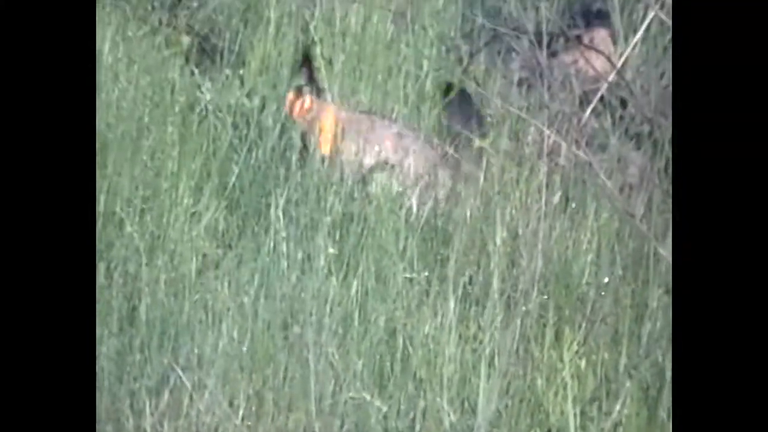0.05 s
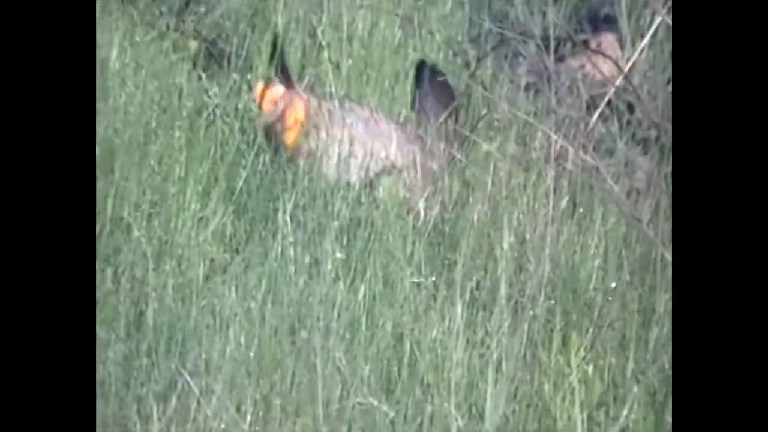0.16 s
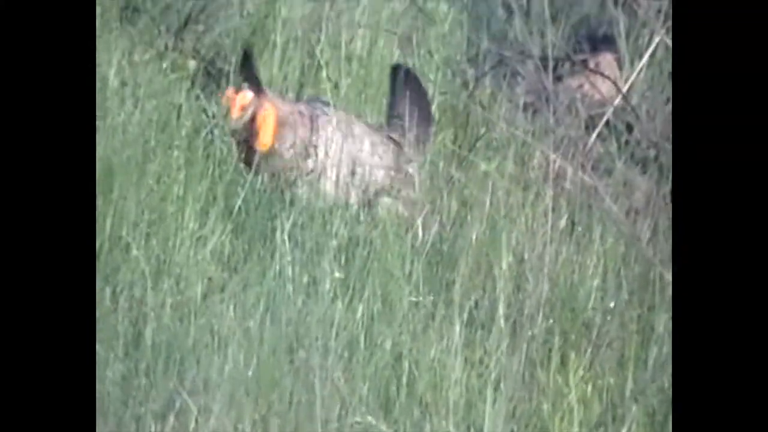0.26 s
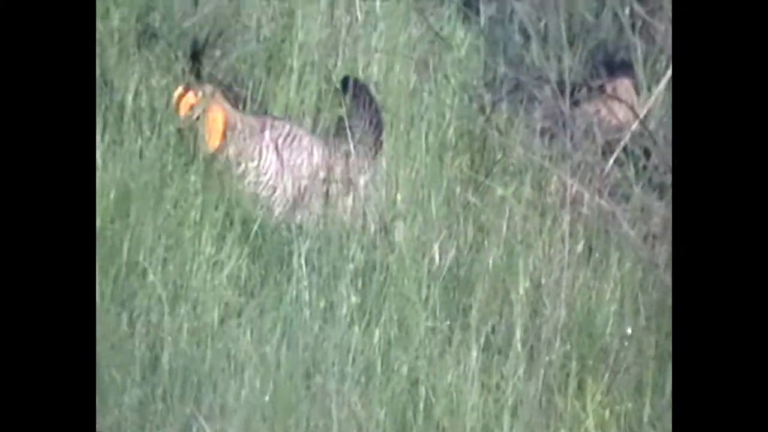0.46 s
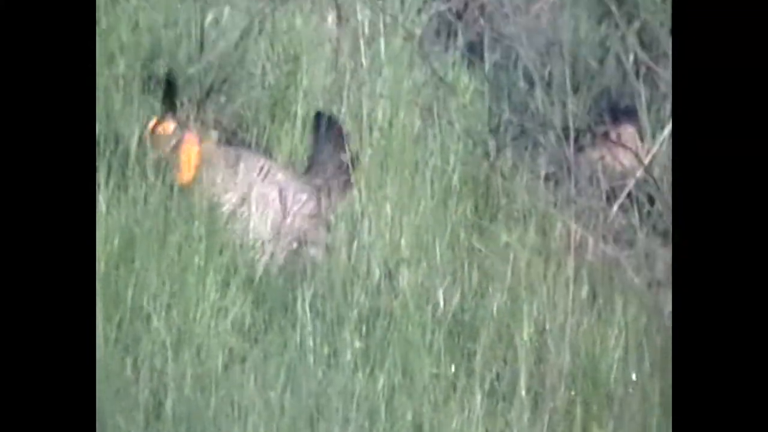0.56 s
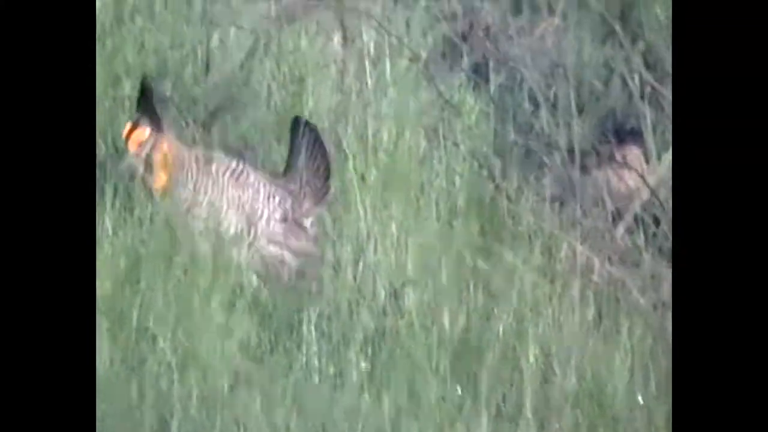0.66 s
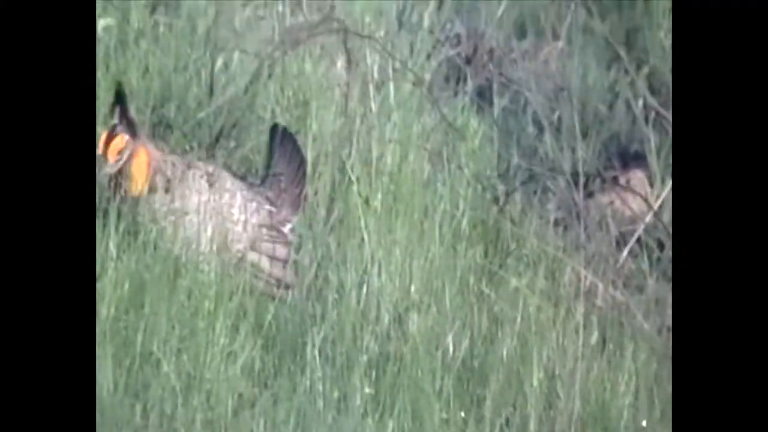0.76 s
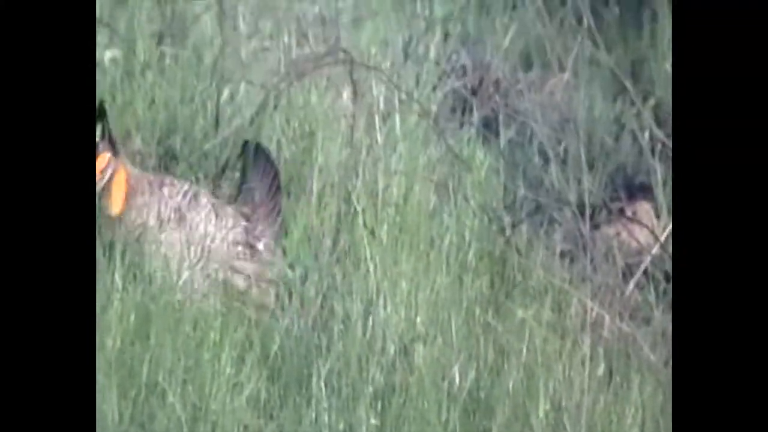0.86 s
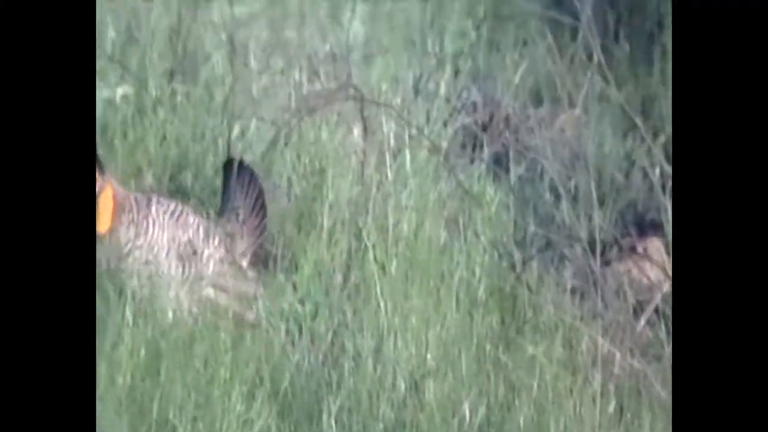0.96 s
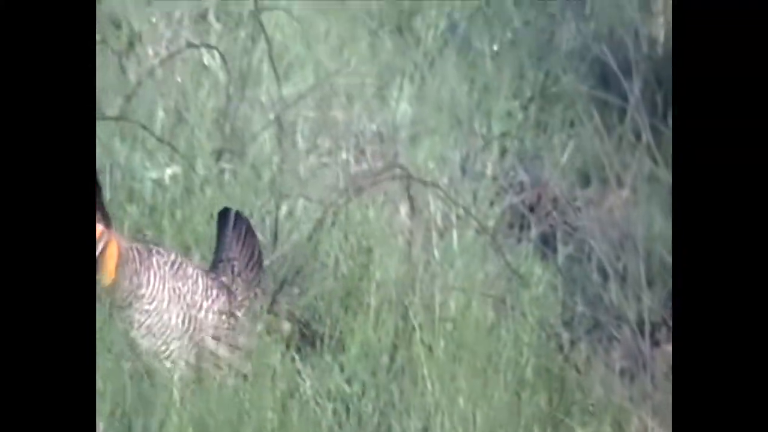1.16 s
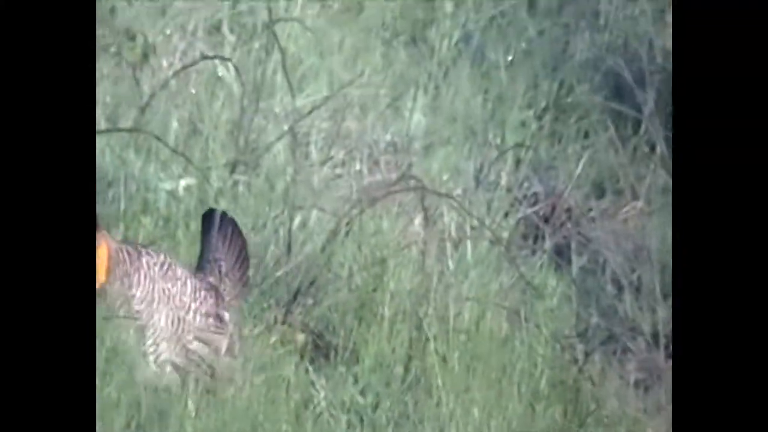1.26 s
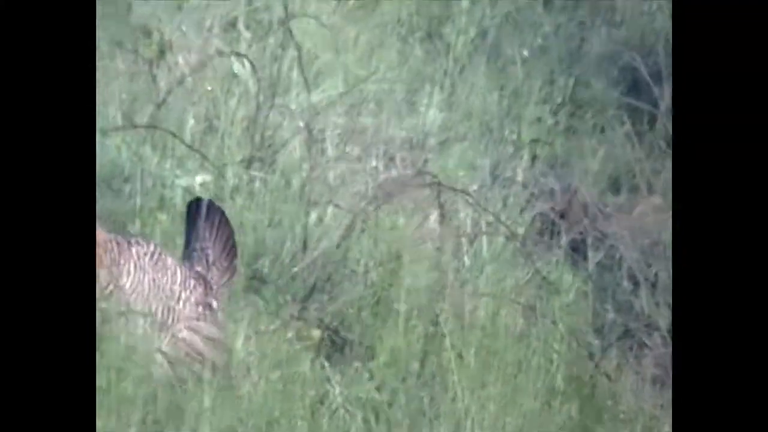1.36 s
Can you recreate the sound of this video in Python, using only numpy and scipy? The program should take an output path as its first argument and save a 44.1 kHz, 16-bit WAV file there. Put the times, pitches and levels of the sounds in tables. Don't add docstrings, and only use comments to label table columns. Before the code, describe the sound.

A meadow songbird, off to the right, whistles a pure high falling note from about 0.05 to 0.3 s, a brief broken waver to 0.4, then a louder long fall peaking near 0.6 and fading by 0.85. Dry grass crackles and soft hollow knocks tick closely, mostly around 0.3-0.4 and 0.9-1.2 s. Quiet open air, low wind, a faint engine drone and distant blurred bird slurs lie beneath.

```python
import sys
import numpy as np
from scipy import signal
from scipy.fft import rfft, irfft
from scipy.io import wavfile
from scipy.ndimage import uniform_filter1d

SR = 44100
rng = np.random.default_rng(int(sys.argv[2]) if len(sys.argv) > 2 else 0)


def volts_from_db(level):
    exponent = np.asarray(level, float) / 20
    return 10 ** exponent


def int16_out(signal):
    q = np.round(np.clip(np.atleast_2d(signal).T, -1, 1) * 32767)
    wavfile.write(sys.argv[1], SR, q.astype(np.int16))


N = 61740


def evened(x):
    return x / np.sqrt(np.mean(x ** 2) + 1e-20)


def read(points, hz):
    f, value = np.transpose(points)
    return np.interp(np.log(hz + 1), np.log(f + 1), value)


def slow(count, span_s):
    size = max(int(span_s * SR), 2)
    drift = uniform_filter1d(rng.standard_normal(count), size)
    return evened(uniform_filter1d(drift, size))


def left_over_right(pan_db):
    return volts_from_db(pan_db * np.array([[.5], [-.5]]))


def add(mix, s, sound, pan_db):
    part = mix[:, round(s * SR):][:, :len(sound)]
    part += sound[:part.shape[1]] * left_over_right(pan_db)


# f/Hz, likeness (1 same, -1 opposed)
PORT_LIKENESS = [(25, -0.1), (60, .45), (110, 0.97), (200, 0.23), (380, 0.15), (690, -.42), (1280, -0.69),
                 (2350, -0.26), (4330, 0.095), (12000, -0.063)]
DIP_HZ, DIP_WIDTH_HZ, DIP_DB = 1183, 130, -7.5


def bed(spectrum, level_db, patch_db, swell_db):
    frames, hz = N // 256 + 5, np.fft.rfftfreq(1024, 1 / SR)
    a, b, c, d, patches = rng.standard_normal((frames, 513, 5)).T
    patches = uniform_filter1d(patches, size=12, axis=0)
    patches = evened(uniform_filter1d(patches, size=8, axis=1))
    swell = evened(uniform_filter1d(rng.standard_normal(frames), size=5))
    same = np.clip(read(PORT_LIKENESS, hz), -1, 1)[:, None]
    left = a + 1j * b
    right = same * left + np.sqrt(1 - same ** 2) * (c + 1j * d)
    dip_db = DIP_DB * np.exp(-((hz - DIP_HZ) / DIP_WIDTH_HZ) ** 2)
    colour_db = (read(spectrum, hz) + dip_db)[:, None]
    z = np.array([left, right]) * volts_from_db(colour_db + patch_db * patches + swell_db * swell)
    noise = signal.istft(z, nperseg=1024, noverlap=768)[1][:, :N]
    return volts_from_db(level_db) * evened(noise)


# f/Hz, level/dB (per Hz)
AIR_COLOUR = [(110, -46.5), (180, -13), (404, -7.5), (497, -16), (740, -10.5), (2650, -19.5), (5500, -24.5),
              (11800, -32), (12600, -57), (16000, -61.5)]


def air():
    return bed(AIR_COLOUR, level_db=-73, patch_db=2.3, swell_db=1.05) * left_over_right(-.6)


# f/Hz, level/dB (per Hz)
WIND_COLOUR = [(8.8, -47), (15, -11.5), (80, 0.5), (103, 0), (162, -9.5), (252, -19), (275, -18.5),
               (300, -12.5), (390, -51.5), (660, -120)]


def wind():
    return bed(WIND_COLOUR, level_db=-68.5, patch_db=-0.64, swell_db=1.7) * left_over_right(1.6)


def hum():
    hz = 80.2 * (1 + 0.02 * slow(N, 0.033))
    level = volts_from_db(-74 + 2.5 * slow(N, 0.023))
    return level * np.sin(2 * np.pi * np.cumsum(hz) / SR) * left_over_right(3)


# t/s, length/s, level/dB, first f/Hz, last f/Hz
FAR_SLURS = [(0, .03, -82, 6250, 5730), (0, 0.037, -81, 3370, 3340), (0.024, .5, -86, 3340, 3324),
             (0.421, 0.09, -73.5, 4350, 4320), (0.441, 0.19, -81, 4840, 4760),
             (0.592, .05, -81.5, 4340, 4280), (0.723, .09, -76, 3290, 3280), (.75, 0.072, -83, 3520, 3470),
             (0.818, 0.12, -79, 3410, 3350), (0.863, 0.15, -81.5, 2930, 3000),
             (0.972, 0.11, -79, 3030, 2940), (1.253, 0.15, -86.5, 3336, 3260)]
FAR_BLUR_DB, FAR_BLUR_HZ = 2.2, 25


def far_bird():
    out = np.zeros((2, N))
    for s, length, db, first_hz, last_hz in FAR_SLURS:
        blur, count = slow(24000, .005), int(length * SR)
        hz = np.linspace(first_hz, last_hz, count) + FAR_BLUR_HZ * blur[:count]
        level = volts_from_db(db + FAR_BLUR_DB * blur[::-1][:count]) * np.hanning(count) ** .5
        add(out, s, level * np.sin(2 * np.pi * np.cumsum(hz) / SR), pan_db=-3)
    return out


# t/s, f/Hz
NOTE_PITCH = [
    [(.052, 5190), (.066, 4965), (.13, 4918), (.16, 4712), (.19, 4600), (.22, 4505), (.25, 4432),
     (.268, 4428), (.312, 4290)],
    [(.312, 4730), (.328, 4715), (.347, 4635), (.372, 4710), (.395, 4650), (.42, 4500)],
    [(.365, 4150), (.405, 4005), (.46, 3950), (.503, 3935), (.59, 3185), (.625, 3030), (.66, 2942),
     (.72, 2890), (.86, 2930)],
]
# t/s, level/dB, left minus right/dB
NOTE_EFFORT = [
    [(.044, -77.5, -11), (.066, -51.5, -10), (.095, -47, -4), (.125, -49.5, -6.5), (.19, -44, -9.5),
     (.22, -43.5, -1), (.29, -37, -7), (.298, -39, -0.5), (.312, -72.5, -19)],
    [(.312, -79.5, -22), (.326, -46.5, -8.5), (.34, -45, -23), (.35, -49.5, -6), (.362, -60.5, -9),
     (.369, -49, -14.5), (.378, -65.5, -18), (.425, -76.5, -16.5)],
    [(.372, -75, 3.5), (.41, -60, -13), (.46, -41.5, -8.5), (.5, -39.5, -8.5), (.59, -30.5, -9),
     (.65, -31.5, -5), (.69, -39, -6), (.745, -39.5, -9), (.824, -59, 0), (.88, -92.5, -14)],
]
# t/s, change/dB, length/s
WHISTLE_DIPS = [(.083, -2.5, .003), (.107, -5, .0025), (.115, -3, .003), (.129, -2, .004),
                (.163, -2.5, .0025), (.15, -2, .003), (.174, -7.5, .0022), (.185, -3, .004),
                (.191, 3, .003), (.2, -7.5, .0035), (.2065, -16, .0015), (.227, -4, .004), (.24, -4, .003),
                (.256, -2.5, .004), (.301, -6, .003), (.34, -6, .004), (.5325, -8, .0022),
                (.569, -2.5, .003), (.592, .5, .004), (.603, .3, .003), (.612, -.8, .004),
                (.791, -7, .003), (.809, -4, .003), (.821, -4.5, .002), (.835, -6, .008), (.851, -8, .004)]
# f/Hz, left lead/radians
LEFT_LEAD = [(2890, 5.3), (2906, 4.2), (2921, 3.1), (2954, 1.2), (2985, .4), (3080, -.3), (3950, 0),
             (4400, -.4), (5200, -.5)]
LIFT_S, LIFT_HZ, LIFT_LENGTH_S = .7925, 40, .004
WOBBLE_HZ, FLUTTER_DB = 10, .45
ECHO_DB, ECHO_T60_S = -22.5, 0.098


def songbird():
    t, out = np.arange(N) / SR, np.zeros((2, N))
    whistle_dip_db = sum(db * np.exp(-((t - s) / length) ** 2) for s, db, length in WHISTLE_DIPS)
    lift_hz = LIFT_HZ * (1 + np.tanh((t - LIFT_S) / LIFT_LENGTH_S)) / 2
    for pitch, effort in zip(NOTE_PITCH, NOTE_EFFORT):
        hz = uniform_filter1d(np.interp(t, *np.transpose(pitch)), size=700) + lift_hz
        s, db, pan_db = np.transpose(effort)
        level_db = uniform_filter1d(np.interp(t, s, db, -140, -140), size=150) + whistle_dip_db
        steady = np.clip((hz - 3000) / 1500, .15, 1)
        turn = 2 * np.pi * np.cumsum(hz + WOBBLE_HZ * steady * slow(N, 0.0056)) / SR
        left_db = level_db + np.interp(t, s, pan_db) + 2 * FLUTTER_DB * slow(N, 0.0025)
        right_db = level_db + FLUTTER_DB * steady * slow(N, 0.001)
        out[0] += volts_from_db(left_db) * np.sin(turn + read(LEFT_LEAD, hz))
        out[1] += volts_from_db(right_db) * np.sin(turn)
    lag = np.arange(8000) / SR
    taps = rng.standard_normal((2, 8000)) * (rng.random((2, 8000)) < .03)
    taps *= volts_from_db(-60 * lag / ECHO_T60_S) * (lag > .003)
    taps /= np.linalg.norm(taps, axis=1)[:, None]
    echoes = signal.fftconvolve(out, taps, axes=1)[:, :N]
    return np.sqrt(2) * (out + volts_from_db(ECHO_DB) * echoes)


# t/s, length/s, level/dB, centre f/Hz, width/octaves
GRASS_RUSTLES = [(.268, .069, -76.5, 10000, .31), (.262, .05, -84, 15000, .04),
                 (.272, .12, -80, 11500, .04), (.3, .13, -73.5, 1600, 1.1), (.314, .058, -64, 8300, .42),
                 (.319, .012, -61, 8300, .3), (.322, .022, -67, 7050, .06), (.33, .035, -69, 5850, .05),
                 (.342, .008, -64, 9600, .15), (.35, .016, -66, 9600, .15), (.345, .06, -88, 13600, .05),
                 (.371, .036, -70, 8500, .5), (.372, .008, -64, 8000, .45), (.389, .006, -73, 6500, .3),
                 (.51, .02, -81, 9800, .15), (.557, .016, -76, 9000, .3), (.55, .05, -87, 13100, .04),
                 (.545, .06, -88, 14900, .03), (.605, .012, -75, 8800, .35), (.62, .04, -83, 12500, .25),
                 (.625, .03, -88, 13800, .05), (.6, .05, -91, 14900, .03), (.625, .03, -91, 15600, .02),
                 (.74, .17, -80, 3500, .12), (.803, .022, -73, 1500, 1.3), (.908, .04, -72, 3900, .3),
                 (.944, .02, -70, 3700, .3), (.97, .045, -88, 13000, .068), (1.161, .015, -77.5, 1500, 1.2),
                 (1.18, .051, -80, 9500, .35), (1.27, .03, -80, 7500, .3)]
# f/Hz, width/Hz, level/dB
STEM_RINGS = [(3750, 90, 3), (4450, 90, 9), (5840, 200, 8), (7050, 250, 9), (8100, 200, 4), (9700, 350, 10)]
GRAIN_DB, SHARED = 2, 0.74
PAN_DB, HIGH_HZ, HIGH_PAN_DB = -2, 9400, 6
TOP_HZ, TOP_DB = 11500, -11


def grass():
    out, hz = np.zeros((2, N)), np.fft.rfftfreq(8192, 1 / SR)
    stems_db = sum(top_db / (1 + ((hz - f) / w) ** 2) for f, w, top_db in STEM_RINGS)
    stems_db = stems_db + TOP_DB * (hz > TOP_HZ)
    for s, length, db, centre_hz, octaves in GRASS_RUSTLES:
        draw, count = rng.standard_normal((4, 8192)), int(length * SR)
        band = np.exp(-(np.log2(hz / centre_hz + 1e-3) / octaves) ** 2 / 2)
        crackle = volts_from_db(GRAIN_DB * evened(uniform_filter1d(draw[3], size=70)))
        grains = crackle * (draw[:2] + SHARED * draw[2])
        sound = evened(irfft(rfft(grains) * band * volts_from_db(stems_db))[:, :count])
        sound *= np.sin(np.pi * np.linspace(0, 1, count) ** 0.72)
        pan_db = PAN_DB + HIGH_PAN_DB * (centre_hz > HIGH_HZ)
        out[:, round(s * SR):][:, :count] += volts_from_db(db) * left_over_right(pan_db) * sound
    return out


# t/s, peak level/dB, f/Hz, length/s, left minus
# right/dB
SMALL_KNOCKS = [(0.32, -74, 630, 0.025, -13), (0.35, -64.5, 380, 0.0056, -4), (0.38, -66, 630, 0.0091, 2),
                (0.37, -55, 598, 0.01, -8), (0.4, -67.5, 570, 0.0073, -11), (.372, -70, 760, 0.0056, -4.5),
                (0.41, -61.5, 356, 0.0053, -4), (.374, -62, 145, .016, -1), (0.54, -81, 593, 0.017, 14.5),
                (0.63, -72.5, 610, 0.015, -0.5), (0.723, -70, 2090, 0.01, -5.5),
                (0.811, -76, 5600, 0.0058, 13), (0.949, -75, 608, 0.015, 6), (.91, -71, 4000, .004, -16),
                (.919, -65.5, 4350, 0.0037, -20), (.927, -70.5, 2900, 0.0088, -19),
                (2.1, -72, 2900, 0.0045, -15), (.948, -70.5, 3200, .005, -19), (.946, -79, 4400, .004, -6),
                (0.952, -74, 3800, 0.0055, -10), (0.994, -69.5, 785, 0.011, 19),
                (1.166, -67.5, 2656, 0.007, -4), (1.34, -78.5, 790, 0.0088, 2)]


def knocks():
    out = np.zeros((2, N))
    for s, db, hz, length, pan_db in SMALL_KNOCKS:
        t = np.arange(0, 1.4 * length, 1 / SR)
        swell = np.sin(np.pi * (t / t[-1]) ** .5) ** 2
        add(out, s, volts_from_db(db) * swell * np.sin(2 * np.pi * hz * t), pan_db)
    return out


def scene():
    floor = air() + wind()
    near = songbird() + knocks() + grass()
    return floor + near + far_bird() + hum()


def low_pass(x):
    return signal.sosfilt(signal.butter(12, 15700, fs=SR, output="sos"), x)


def record(dry):
    return low_pass(dry)


dry = scene()
out = record(dry)
int16_out(out)
```